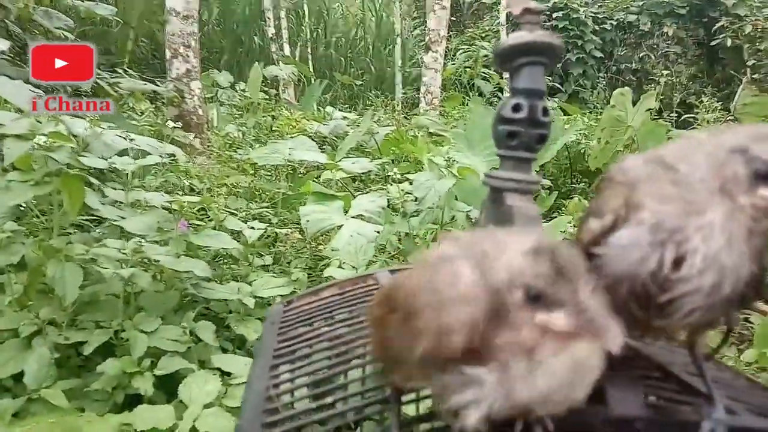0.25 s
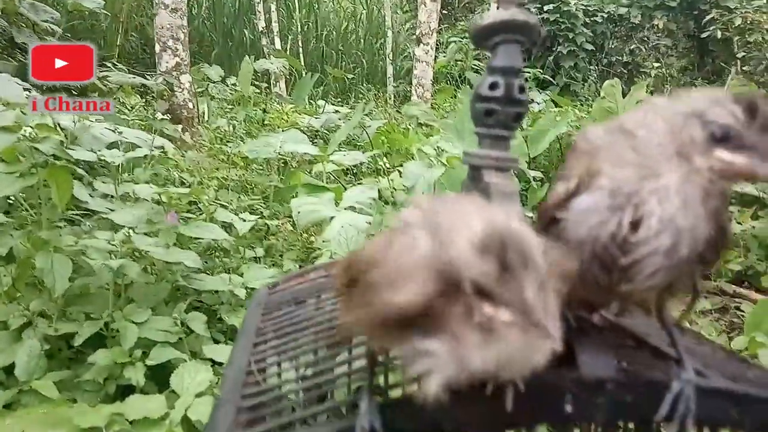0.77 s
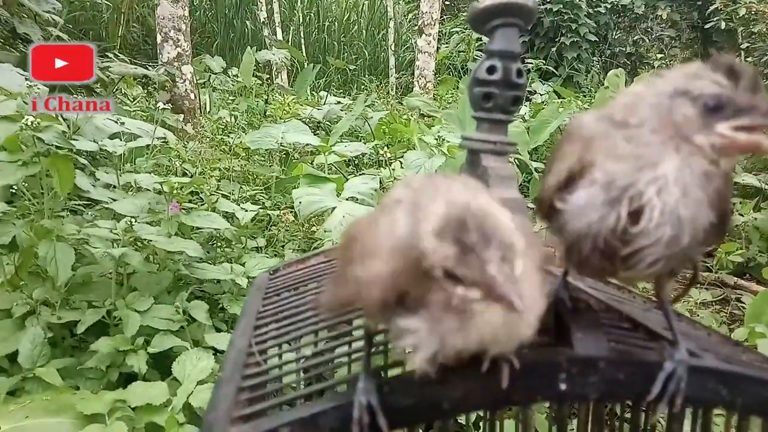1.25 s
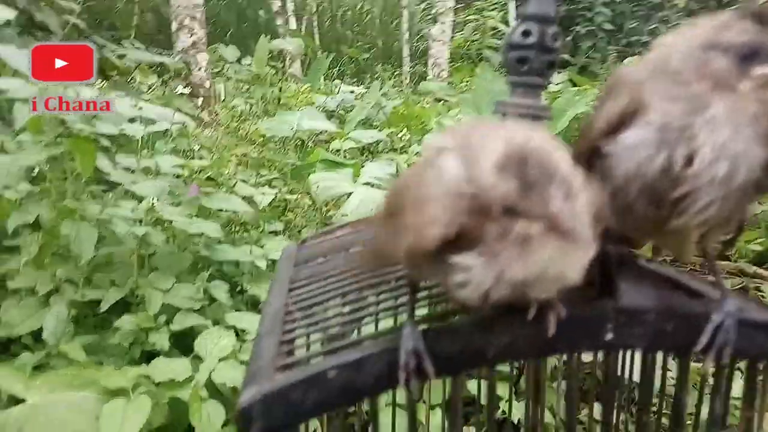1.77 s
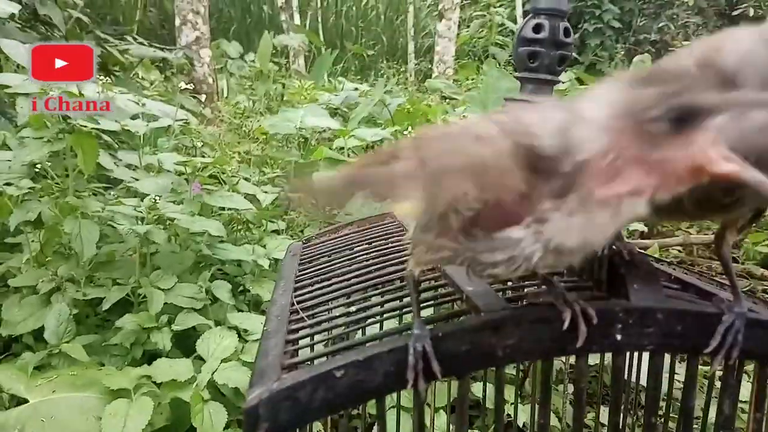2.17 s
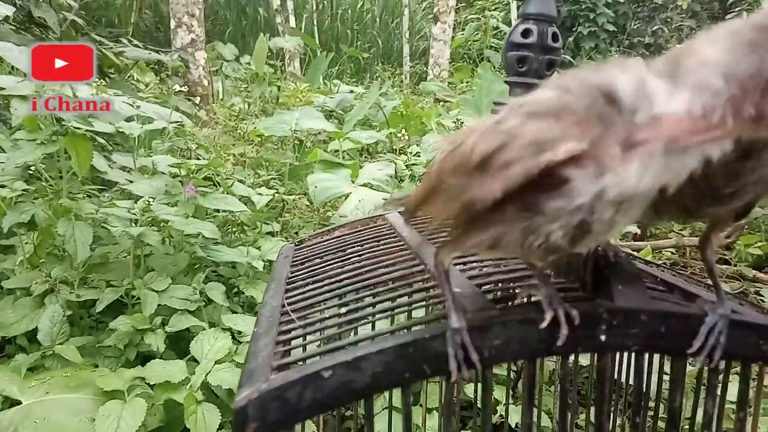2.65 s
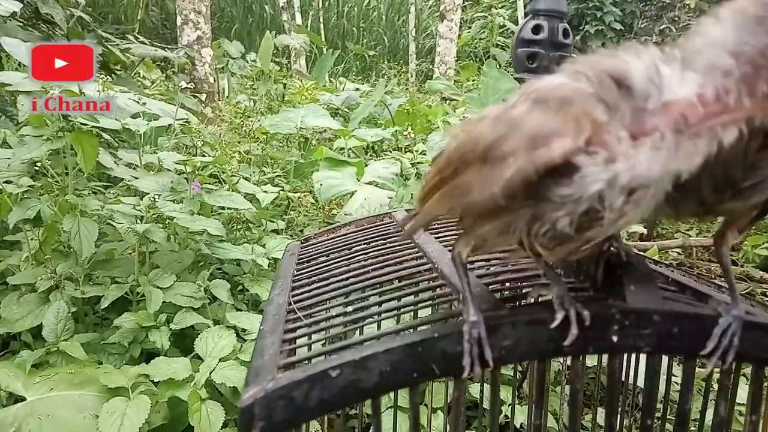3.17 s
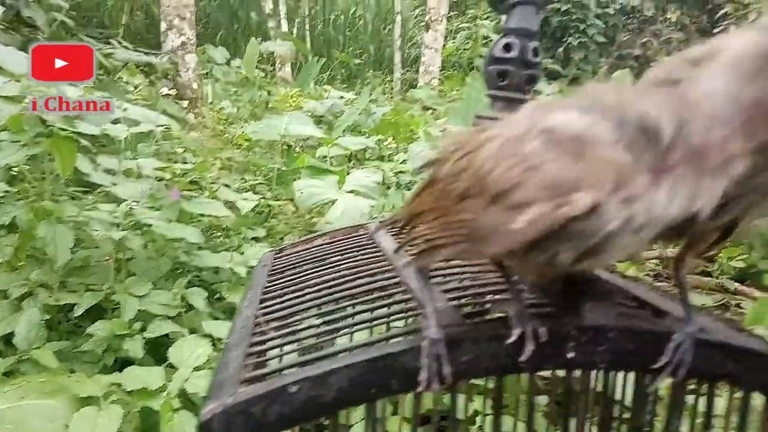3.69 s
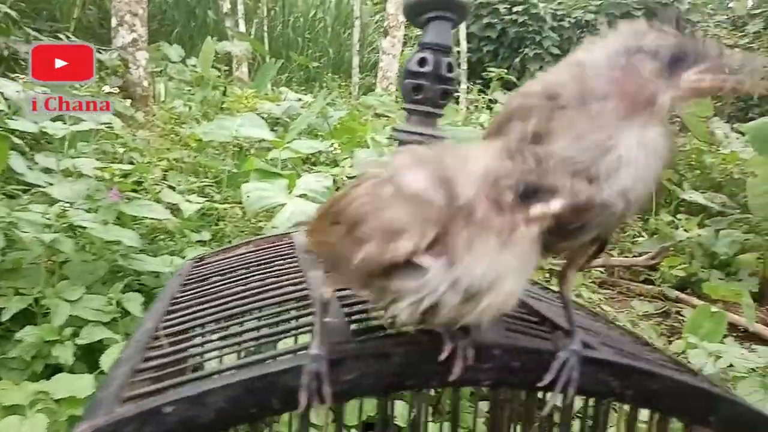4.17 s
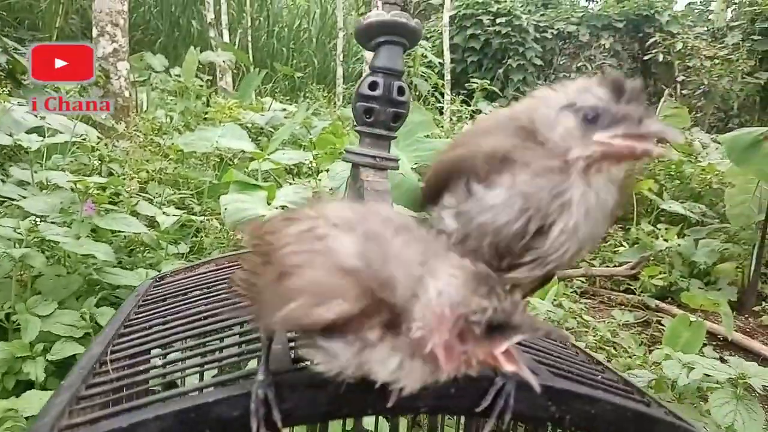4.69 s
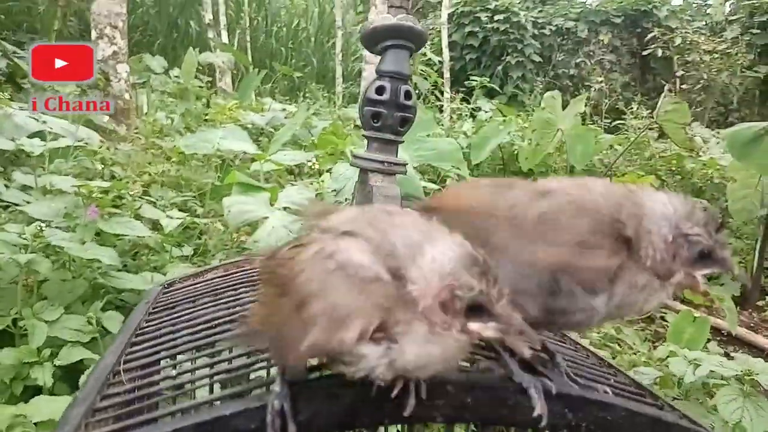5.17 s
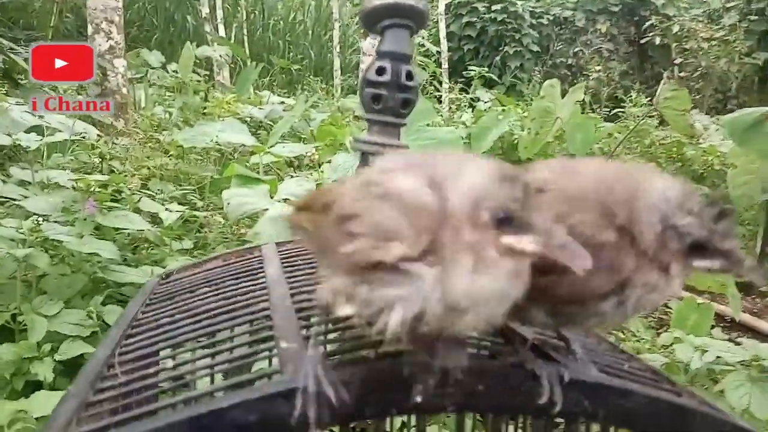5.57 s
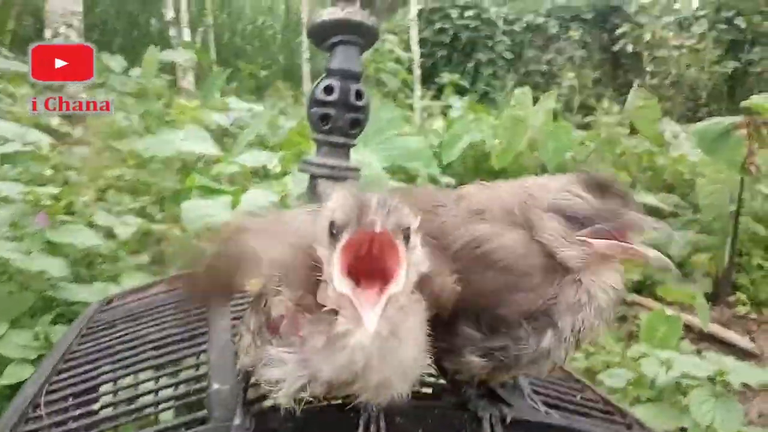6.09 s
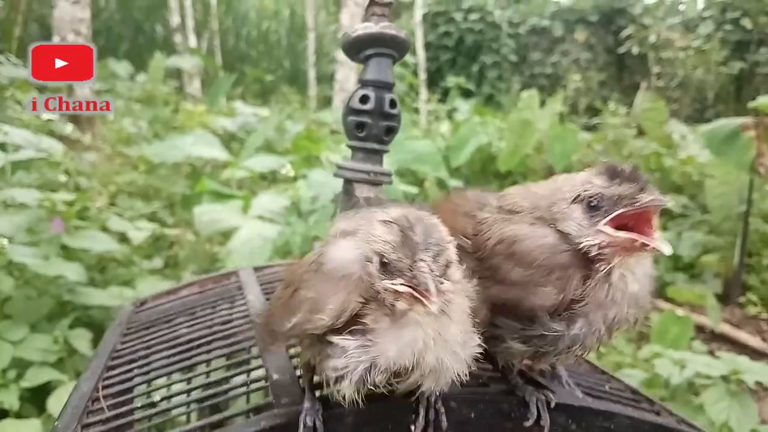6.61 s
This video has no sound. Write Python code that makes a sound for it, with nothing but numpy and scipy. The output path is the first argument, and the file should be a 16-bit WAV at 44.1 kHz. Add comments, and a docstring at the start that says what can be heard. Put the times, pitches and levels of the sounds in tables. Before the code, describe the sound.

Harsh, bright begging chirps from two young birds burst in loose clusters, nearly touching the microphone, above shimmering insects and a low far engine.

```python
"""Fledglings begging in a garden

Two fledglings beg close by on a wire cage: one loud and full, one thinner and higher.
Each chirp starts as filtered-noise rasp, locks into a harmonic tone that arches over two crests, and sinks away.
Swept sines make closing squeaks and noise bursts make taps; a sparse echo follows them.
Insects pulse and drone as sine strokes and throbbing noise; a far engine, gathering speed, hums as sine orders
over rumble. Low swells, a far call and still air, all coloured noise, lie behind."""
import sys
import numpy as np
from scipy import signal
from scipy.fft import rfft, irfft, next_fast_len
from scipy.io import wavfile
from scipy.ndimage import uniform_filter1d, minimum_filter1d, map_coordinates

SR = 44100
rng = np.random.default_rng(int(sys.argv[2]) if len(sys.argv) > 2 else 0)


def wrap_up_sound(samples):
    """Save the sound to the file named by the first command line argument, as 16-bit audio."""
    columns = np.atleast_2d(samples).T
    # keep every value between -1 and 1, then stretch to whole-number steps
    tamed = np.clip(columns, -1, 1)
    steps = np.round(tamed * 32767).astype(np.int16)
    wavfile.write(sys.argv[1], SR, steps)


N = 302085  # samples

# Chirps of each bird: first_crest_s, first_crest_hz, second_crest_hz, first_crest_to_end_ms,
# level_db (2nd and 4th harmonics together, before the throat), brightness_db (4th over 2nd harmonic)
LOUD_CHIRPS = [(0.003, 1724, 1140, 26, -13.5, -4.5), (0.081, 1660, 1247, 35, -8.5, 1),
               (0.216, 1470, 1232, 30, -8, -3.5), (0.266, 1490, 1084, 29, -8.5, -14),
               (0.742, 1661, 1273, 39, -7, -14), (0.841, 1486, 1112, 42, -7, -16.5),
               (0.99, 1515, 1168, 47, -5.5, -20), (1.154, 1617, 1168, 50.4, -6.5, -17.5),
               (1.811, 1788, 1394, 33, -9, 6.5), (1.925, 1532, 1212, 43, -7, 4),
               (2.083, 1393, 1130, 30, -5.5, 5.5), (2.125, 1285, 960, 16, -10.5, 3.5),
               (3.132, 1526, 1484, 44, -9.5, -10.5), (3.265, 1599, 1173, 51.5, -9, -11),
               (3.409, 1458, 1137, 50.6, -8.5, -8.5), (4.233, 1736, 1635, 40, -11, -10.5),
               (4.381, 1537, 1301, 40, -8, -1), (4.541, 1407, 1201, 47, -6.5, -3.5),
               (4.573, 1031, 1123, 34, -9, 1.5), (4.739, 1587, 1142, 49, -6, -3),
               (5.534, 1750, 1530, 36, -9, -6.5), (5.648, 1509, 1207, 38, -8.5, -8.5),
               (5.825, 1522, 1220, 37, -8.5, 7), (5.867, 1390, 1007, 24, -11, 13),
               (5.919, 1449, 1007, 18, -9, 10), (6.094, 1504, 1282, 47.3, -5.5, 14),
               (6.234, 1438, 1159, 44, -8.5, 13.5), (6.788, 1779, 1300, 36, -9.5, 6.5)]
THIN_CHIRPS = [(0.954, 1920, 1504, 29, -23.5, -8), (1.066, 1800, 1780, 25.6, -18.5, -11.5),
               (1.234, 1542, 1493, 31, -19.5, -11), (1.886, 1906, 1795, 37, -27, 2),
               (1.978, 1950, 1880, 28, -24, 1.5), (2.174, 1900, 1680.0, 19.7, -18.5, 0.5),
               (2.281, 1730, 1613, 30, -18.5, 3.5), (2.365, 1693, 1620, 24.7, -16.5, 2.5),
               (2.516, 1569.0, 1490, 35.8, -17.0, 2.5), (2.593, 1584, 1525, 23.7, -15, 2),
               (2.749, 1636, 1532, 29, -16.5, 1.5), (2.841, 1727, 1581.0, 23.6, -14.5, 3.5),
               (2.986, 1650, 1530, 27, -15, 3.5), (3.109, 1609, 1480, 28, -15, 1),
               (3.253, 1663, 1555, 22, -15, -0.5), (3.696, 1735, 1496, 23.8, -22.5, -8),
               (3.802, 1574, 1487, 53, -32, -14.5), (3.956, 1440.0, 1384, 42, -24, -20),
               (4.014, 1370, 1444, 8.5, -19.5, -15), (4.144, 1404, 1344.0, 36, -20, -16),
               (4.867, 1860, 1700, 26.3, -18.0, -5.5), (4.99, 1740, 1557, 25.4, -17.5, -5.5),
               (5.146, 1455.0, 1350, 30, -21.5, -10), (5.959, 1819, 1674.0, 26, -18, -10),
               (6.059, 1690, 1668, 38, -16.5, 1.5), (6.215, 1530, 1430, 25, -18.0, -2),
               (6.375, 1370.0, 1270, 38.4, -12.5, 2.5), (6.862, 1500.0, 1415, 30.0, -16.5, -4)]
# Colour of each bird's rasp, before brightness tilts it: freq_hz, relative_level_db
LOUD_RASP_COLOUR = [(300, -52), (700, -28), (1100, -9), (1700, -5.5), (2100, -2), (3200, 14), (4500, -20.5),
                    (5500, 2.5), (7000, -16.5), (9000, -45.5), (15000, -36.5)]
THIN_RASP_COLOUR = [(300, -54), (800, -41), (1300, -11), (2000, -4.5), (3400, -18), (4500, 3.5),
                    (5500, 5.5), (6400, 3), (7500, -41.5), (9500, -20), (15000, -46)]
# Resonance of each bird's throat: freq_hz, gain_db
LOUD_THROAT_GAIN = [(1800, -4.5), (2500, -2.5), (3500, -3), (4600, 1), (5200, 0), (6200, -8.5), (8000, -20),
                    (15000, -29)]
THIN_THROAT_GAIN = [(3000, -1), (4000, -11), (5400, 5.5), (6300, 2), (8000, -9), (15000, -30.5)]
# Treble of each bird, harmonics 5 and up, against its chirp: time_s, relative_level_db
LOUD_TREBLE_LEVEL = [(.2, -21), (1.1, -32.5), (1.9, -22.5), (2.1, -12), (3.4, -16), (4.23, 1), (4.38, -14),
                     (6.8, -16.5)]
THIN_TREBLE_LEVEL = [(1, -16.5), (3, -17), (3.7, -15), (4.1, -17.5), (4.87, -4), (5.2, -15.5), (5.9, -17.5),
                     (6.3, -6.5)]
# Balance of harmonics 5 to 10 within the treble: relative_level_db
TREBLE_STEPS = [-2.5, 2.5, -5, 4, -14.5, -9]
# Colour of the wide fizz: freq_hz, relative_level_db
FIZZ_COLOUR = [(200, -12), (600, -0.5), (2000, 6), (9000, -2.5), (12500, 3.5), (15500, 1.5)]
# Thin falling squeaks: start_s, length_s, start_hz, end_hz, peak_db
SQUEAK_EVENTS = [(1.995, 0.013, 6800, 5110, -11), (3.714, 0.014, 6000, 5530, -18.5),
                 (4.896, 0.022, 5800, 2800, -30), (5.988, 0.014, 6330, 2750, -33)]
# Light taps of claws and bills: start_s, nominal_peak_db
TAP_EVENTS = [(4.697, -23.5), (4.82, -21.5), (5.609, -26), (6.459, -21), (6.479, -31)]
# Colour of a tap: freq_hz, relative_level_db
TAP_COLOUR = [(300, -20), (2000, 6.5), (6000, 0.5), (15000, -11)]
# Colour of the high insect chorus: freq_hz, relative_level_db
CHORUS_COLOUR = [(6200, -41), (6900, -16.5), (7400, -4), (7750, -8.5), (8020, -8), (8300, -6), (9000, 2.5),
                 (9600, 1), (10300, -10), (11200, -28), (14000, -44.5)]
# Colours of the lower insect haze and the thin whine: freq_hz, relative_level_db
HAZE_COLOUR = [(3800, -66.5), (4600, -12), (5000, 5.0), (5450, 3), (5900, -23.5), (6800, -69.5)]
WHINE_COLOUR = [(7300, -60), (7900, -14), (8020, 0), (8150, -14), (8800, -60)]
# Colour of still air: freq_hz, relative_level_db
AIR_COLOUR = [(25, -8), (100, -11), (350, -2), (600, -0.5), (1000, -9.5), (3000, -12), (6300, -9.5),
              (12000, -19), (15500, -17)]
# Loudness of the far call: time_s, rms_level_db
FAR_CALL_LEVEL = [(.3, -68), (.47, -68.5), (.7, -82), (4.8, -74.5), (5.36, -58.5), (5.5, -56), (5.9, -74)]
# Colour of the far call: freq_hz, relative_level_db
FAR_CALL_COLOUR = [(700, -35), (1150, -11.5), (1380, -0.5), (1700, -9.0), (2400, -51.0)]
# Low far-off swells: centre_s, length_s, pitch_hz, level_db (noise rms under the window's peak)
SWELL_EVENTS = [(.35, 0.17, 169.3, -39), (1.7, 0.23, 165, -43.5), (2.527, 0.086, 70, -43)]
# Decay of the garden echo: freq_hz, t60_s
GARDEN_DECAY = [(300, 0.37), (2500, 0.09), (6000, 0.36), (14000, 0.078)]
# Engine speed before its unsteadiness: time_s, turns_per_s
ENGINE_SPEED_CURVE = [(0, 54), (.8, 53), (1.1, 58), (1.6, 61.5), (2.4, 66), (3.3, 69), (4.3, 69.8),
                      (6.85, 68)]
# Reference level of the engine hum below 160 Hz, then of the hum above it: time_s, reference_level_db
LOW_HUM_LEVEL = [(0, -47.5), (.35, -57.5), (.55, -64), (1, -50.5), (1.6, -43.5), (1.9, -50), (2.5, -44.5),
                 (4.2, -43), (5.4, -47), (6.2, -52), (6.8, -47.5)]
UPPER_HUM_LEVEL = [(0, -49.5), (.35, -46.5), (.6, -55.5), (.85, -40), (1.1, -60), (1.7, -48.5),
                   (1.9, -60.5), (2.25, -52.5), (2.9, -66.5), (3.2, -53), (3.45, -59), (4.2, -48),
                   (4.9, -51.5), (6.1, -67), (6.85, -61.5)]
# Colours of the two rumble bands: freq_hz, relative_level_db
LOW_RUMBLE_COLOUR = [(20, -24), (55, -19.5), (110, 0), (170, -5), (300, -33), (900, -46.5)]
UPPER_RUMBLE_COLOUR = [(120, -25), (210, 0.5), (270, -8), (350, -20.5), (900, -45.5)]

# Voices: time between crests, share of the second crest held through the dip, 1st and 3rd harmonics,
# rasp, fizz, extra pitch flutter (fraction) before locking, rise of the tone in the lead-in
LOUD_VOICE = dict(gap_ms=15.5, dip_share=0.15, first_db=-25, third_db=-14, rasp_db=-11.5, fizz_db=-20,
                  chaos=.035, rise_db=14,
                  throat=LOUD_THROAT_GAIN, rasp=LOUD_RASP_COLOUR, treble=LOUD_TREBLE_LEVEL)
THIN_VOICE = dict(gap_ms=23, dip_share=0.79, first_db=-18.5, third_db=-3.5, rasp_db=-5, fizz_db=-19.5,
                  chaos=.07, rise_db=31,
                  throat=THIN_THROAT_GAIN, rasp=THIN_RASP_COLOUR, treble=THIN_TREBLE_LEVEL)

# pitch in the lead-in and under the crests; first rate and greatest depth of the closing fall
START_HZ, REST_HZ, SAG_HZ_PER_MS, SAG_DEPTH_HZ = 1022.7, 1115.5, 9, 230
CREST_MS, LOCK_MS = 5.5, 14  # half width of a crest; time before it in which flutter locks into a tone
JITTER, WAVER = .009, .018  # lasting fast and slower pitch unsteadiness, fractions
SHIMMER_DB, GRAIN_DB = 2.88, 5  # unsteadiness of each harmonic and of the rasp
LEAD_MS, FADE_MS, EDGE_DB_PER_MS = 24.77, 7.6, 1.5  # longest lead-in, closing fade, edges outside them
SHORTEST_LEAD_MS, OVERLAP_MS = 4.7, 4.7  # a chirp right after another cuts its lead-in short
TONE_FADE_DB, TONE_DROOP_DB_PER_MS = 22, 0.5  # loss over the fade, and after the second crest
RASP_RISE_DB, RASP_DROP_DB, RASP_PEAK_MS = 2.5, 17, 5  # swells until just before the crest, then gives way
RASP_TILT, RASP_GROWTH = 0.61, 0.32  # rasp colour and strength against brightness, dB per dB
FIZZ_GROWTH, FIZZ_TREBLE = 1.48, 0.097  # fizz against tone level and treble level, dB per dB
CRICKET_GROUP_S, CRICKET_STROKE_S, TRILL_STROKE_S = .135, .027, .023  # spacings
AIR_DB, ECHO_DB = -70.5, -29.5
TOP_HZ = 15850  # band limit


def amp(db):
    """Decibel law: 20 dB is a tenfold amplitude."""
    return 10 ** (np.asarray(db) / 20)


def unit(x):
    """Power normalisation: x at rms 1."""
    return x / np.sqrt(np.mean(x ** 2) + 1e-20)


def along(points, hz):
    """Logarithmic frequency scale: (Hz, value) points interpolated on a log axis."""
    f, v = np.transpose(points)
    return np.interp(np.log(hz + 1), np.log(f + 1), v)


def curves(rows):
    """Linear interpolation in time: one value per sample for each column after the time."""
    s, *cols = np.transpose(rows)
    return [np.interp(np.arange(N) / SR, s, c) for c in cols]


def ramp(x, start, end):
    """Linear transition: 0 before start, 1 after end, straight between."""
    return np.clip((x - start) / (end - start), 0, 1)


def wobble(rate, size=N):
    """Band-limited random modulation: a smooth curve through rate random knots a second."""
    knots = rng.standard_normal(int(size * rate / SR) + 4)
    return map_coordinates(knots, [np.arange(size) * rate / SR])


def noise(spectrum, size=N):
    """Spectral shaping: white noise weighted by a (Hz, dB) colour, at rms 1."""
    m = next_fast_len(size + 2048)
    white = rfft(rng.standard_normal(m))
    gain = amp(along(spectrum, np.fft.rfftfreq(m, 1 / SR)))
    return unit(irfft(white * gain, m)[:size])


def turns(hz):
    """Phase accumulation: the integral of frequency, in radians."""
    return 2 * np.pi * np.cumsum(hz) / SR


def add(track, s, sound):
    """Superposition: mix a sound into the track from time s."""
    start = round(s * SR)
    a, b = max(start, 0), min(start + len(sound), N)
    if b > a:
        track[a:b] += sound[a - start:b - start]


def distance():
    """Coloured-noise radiation: windowed low swells, a faint far call, and still air."""
    swells = np.zeros(N)
    for s, length, hz, db in SWELL_EVENTS:
        size = int(length * SR)
        colour = [(hz / 2, -24), (hz, 0), (2 * hz, -32), (10 * hz, -80)]
        add(swells, s - length / 2, amp(db) * np.hanning(size) * noise(colour, size))
    call = amp(curves(FAR_CALL_LEVEL)[0]) * noise(FAR_CALL_COLOUR)
    return swells + call + amp(AIR_DB) * noise(AIR_COLOUR)


def engine():
    """Rotational orders: sines at 2, 3 and 4 times the engine's speed over two bands of rumble."""
    (low_db,), (upper_db,) = curves(LOW_HUM_LEVEL), curves(UPPER_HUM_LEVEL)
    unsteady = 1 + .006 * wobble(5) + .012 * wobble(27)
    phase = turns(curves(ENGINE_SPEED_CURVE)[0] * unsteady)
    orders_db = [low_db - 1.5, upper_db - 1.5, upper_db - 7.5]
    hum = sum(amp(db + 2.5 * wobble(9)) * np.sin(k * phase) for k, db in enumerate(orders_db, 2))
    low = amp(low_db - 4 + 1.8 * wobble(10)) * noise(LOW_RUMBLE_COLOUR)
    upper = amp(upper_db - 5 + 1.5 * wobble(20)) * noise(UPPER_RUMBLE_COLOUR)
    return hum + low + upper


def cricket(times, hz, db, length, rise):
    """Stridulation: each wing stroke is a short rising whistle."""
    track, size = np.zeros(N), int(length * SR)
    sweep = 1 + rise * np.linspace(-1, 1, size)
    for s, loud in zip(times, rng.standard_normal(len(times))):
        phase = turns(hz * sweep * (1 + .008 * wobble(660, size)))
        add(track, s, amp(db + 1.5 * loud) * np.hanning(size) * np.sin(phase))
    return track


def insects():
    """Amplitude modulation: a cricket mostly in paired strokes, a trill, haze, throbbing chorus and whine."""
    groups = np.arange(.02, N / SR, CRICKET_GROUP_S)
    draws = rng.uniform([0, 1.6], [.015, 3.2], (len(groups), 2))  # lateness in s, number of strokes
    strokes = [s + late + CRICKET_STROKE_S * k
               for s, (late, many) in zip(groups, draws) for k in range(int(many))]
    near = cricket(strokes, 5350, db=-35, length=.022, rise=.03)
    far = cricket(np.arange(0, N / SR, TRILL_STROKE_S), 5130, db=-42, length=.0085, rise=.045)
    haze = amp(-55.5) * noise(HAZE_COLOUR)
    throb = np.sin(turns(84 * (1 + 0.047 * wobble(9))))
    chorus = amp(-51 + 0.79 * throb) * noise(CHORUS_COLOUR)
    whine = amp(-58 + 4 * throb) * noise(WHINE_COLOUR)
    return near + far + haze + chorus + whine


def garden(x):
    """Diffuse scattering: leaves and trunks return a short echo whose decay depends on frequency."""
    hz, t, z = signal.stft(rng.standard_normal(SR // 2), SR, nperseg=256)
    decay = amp(-60 * t / along(GARDEN_DECAY, hz)[:, None])
    tail = signal.istft(z * decay, SR, nperseg=256)[1]
    delayed = np.pad(x, (300, 0))  # samples
    return signal.fftconvolve(delayed, tail / np.linalg.norm(tail))[:N]


def taps():
    """Impact excitation: short dry ticks on the cage, a quick rise and exponential decay of noise."""
    track, t = np.zeros(N), np.arange(SR // 20) / SR
    for s, db in TAP_EVENTS:
        decay = amp(db - 12 - 60 * t / .04)  # 12 dB allows for the noise's peaks above its rms
        add(track, s, decay * (1 - np.exp(-t / .0015)) * noise(TAP_COLOUR, len(t)))
    return track


def squeaks():
    """Frequency glide: a windowed sine falls in equal ratios."""
    track = np.zeros(N)
    for s, length, start_hz, end_hz, db in SQUEAK_EVENTS:
        size = int(length * SR)
        phase = turns(np.geomspace(start_hz, end_hz, size))
        add(track, s, amp(db) * np.hanning(size) * np.sin(phase))
    return track


def arch(ms, gap, crest_hz, second_hz, dip_share):
    """Frequency modulation: two rounded crests on a base that rises, holds and sags."""
    dip_hz = REST_HZ + dip_share * (second_hz - REST_HZ)
    sag = SAG_DEPTH_HZ * np.tanh(SAG_HZ_PER_MS * np.maximum(ms - gap, 0) / SAG_DEPTH_HZ)
    base = START_HZ + (dip_hz - START_HZ) * ramp(ms, -LOCK_MS, 0) - sag
    crests = [(0, crest_hz), (gap, second_hz)]
    return base + sum((hz - dip_hz) * np.exp(-((ms - at) / CREST_MS) ** 2) for at, hz in crests)


def stack(pitch, levels_db, throat):
    """Source and filter: shimmering harmonics of the pitch, heard through the throat."""
    phase = turns(pitch)
    total = 0
    for k, db in enumerate(levels_db, 1):
        level_db = db + along(throat, k * pitch) + SHIMMER_DB * wobble(230, len(pitch))
        total = total + amp(level_db) * np.sin(k * phase)
    return np.sqrt(2) * total


def chirp(row, lead, voice):
    """Syrinx oscillation: chaotic flutter locks into a stack with strong even harmonics; gives start and sound."""
    s, crest_hz, second_hz, length, db, bright_db = row
    ms = np.arange(-50, 70, 1000 / SR)  # from the first crest
    size, gap = len(ms), min(voice["gap_ms"], .8 * length)
    treble_db = np.interp(s, *np.transpose(voice["treble"]))
    edges_db = -EDGE_DB_PER_MS * (np.maximum(-lead - ms, 0) + np.maximum(ms - length, 0))
    # the tone swells, locks, droops and fades
    flutter = JITTER + voice["chaos"] * (1 - ramp(ms, -LOCK_MS, 0))
    unsteady = 1 + flutter * wobble(1100, size) + WAVER * wobble(200, size)
    pitch = arch(ms, gap, crest_hz, second_hz, voice["dip_share"]) * unsteady
    rise_db = -voice["rise_db"] * (1 - ramp(ms, -lead, 0)) ** 2
    droop_db = -TONE_DROOP_DB_PER_MS * np.maximum(ms - gap, 0)
    fade_db = -TONE_FADE_DB * ramp(ms, length - FADE_MS, length) ** 2
    voiced = amp(edges_db + rise_db + droop_db + fade_db)
    # brightness shares the chirp's power between harmonics 2 and 4
    second_db = db - 10 * np.log10(1 + amp(bright_db) ** 2)
    third_db = second_db + bright_db / 2 + voice["third_db"]
    lower = [second_db + voice["first_db"], second_db, third_db, second_db + bright_db]
    upper = [db + treble_db + step for step in TREBLE_STEPS]
    tone = voiced * stack(pitch, lower + upper, voice["throat"])
    # the rasp leads in and gives way to the tone
    swell_db = RASP_RISE_DB * (ramp(ms, -lead, -RASP_PEAK_MS) - 1)
    yield_db = -RASP_DROP_DB * ramp(ms, -RASP_PEAK_MS, RASP_PEAK_MS)
    colour = [(hz, level + RASP_TILT * bright_db * ramp(hz, 3000, 4500)) for hz, level in voice["rasp"]]
    rasp_db = db + voice["rasp_db"] + RASP_GROWTH * bright_db + swell_db + yield_db + edges_db
    rasp = amp(rasp_db) * noise(colour, size) * unit(amp(GRAIN_DB * wobble(500, size)))
    # a faint wide fizz grows faster than the tone, so it rides on the loudest moments
    fizz_level = amp(voice["fizz_db"] + FIZZ_TREBLE * treble_db) * (amp(db) * voiced) ** FIZZ_GROWTH
    fizz = fizz_level * noise(FIZZ_COLOUR, size)
    return s + ms[0] / 1000, tone + rasp + fizz


def fledglings():
    """Superposed voices: both birds' chirps, often overlapping, and a few closing squeaks."""
    track = np.zeros(N)
    for rows, voice in [(LOUD_CHIRPS, LOUD_VOICE), (THIN_CHIRPS, THIN_VOICE)]:
        last_end = -1
        for row in rows:
            s, length = row[0], row[3]
            lead = np.clip(1000 * (s - last_end) + OVERLAP_MS, SHORTEST_LEAD_MS, LEAD_MS)
            add(track, *chirp(row, lead, voice))
            last_end = s + length / 1000
    return track + squeaks()


def scene():
    """Direct and scattered sound: close birds and their echo in front of the garden's background."""
    near = fledglings() + taps()
    echo = amp(ECHO_DB) * garden(near)
    return (near + echo + insects() + engine() + distance())[None]


def record(dry):
    """Peak limiting and band limiting: a fast gain holds peaks at full scale, then the top band is removed."""
    needed = 1 / np.maximum(np.abs(dry), 1)
    gain = uniform_filter1d(minimum_filter1d(needed, size=65), size=65)
    m = next_fast_len(N + 4096)
    kept = np.fft.rfftfreq(m, 1 / SR) < TOP_HZ
    return irfft(rfft(dry * gain, m) * kept, m)[:, :N]


dry = scene()
out = record(dry)
wrap_up_sound(out)
```